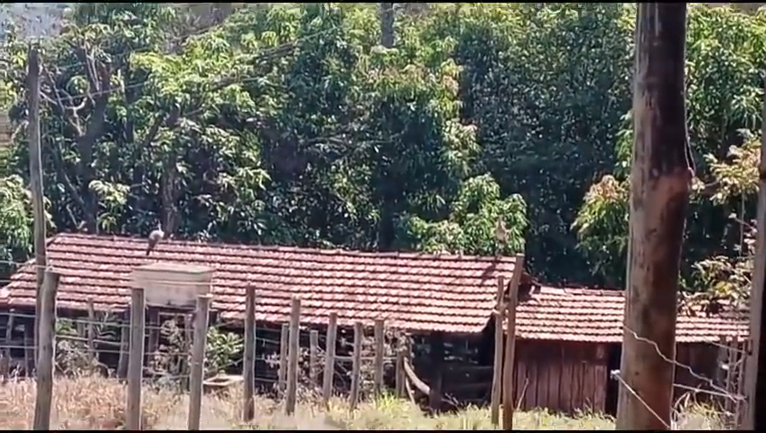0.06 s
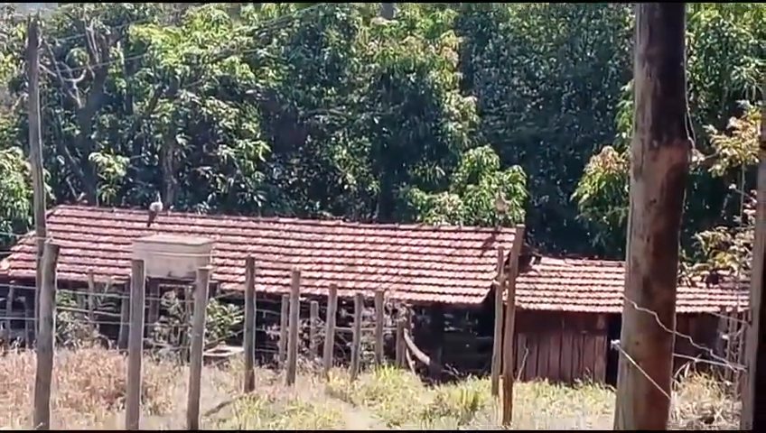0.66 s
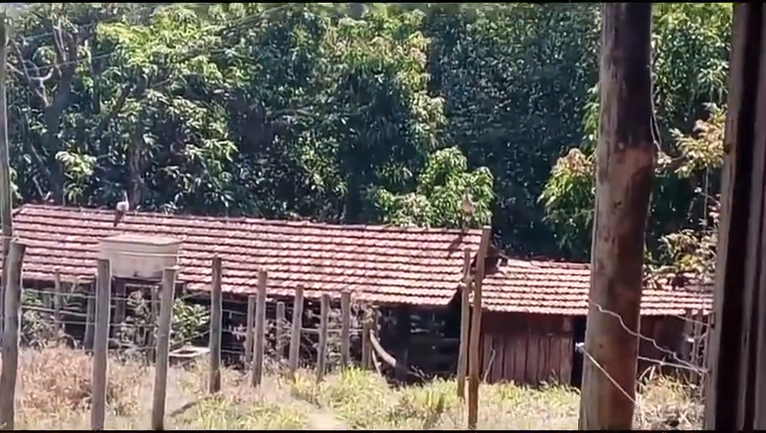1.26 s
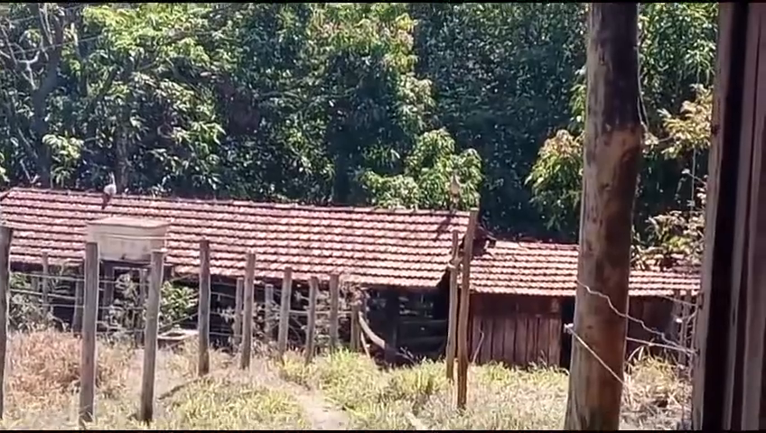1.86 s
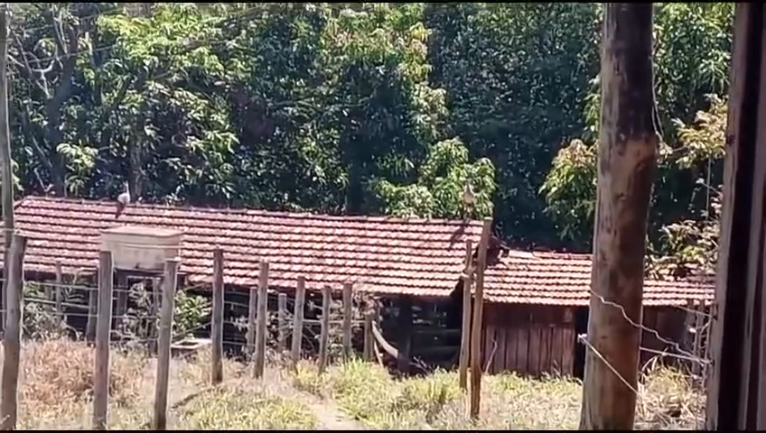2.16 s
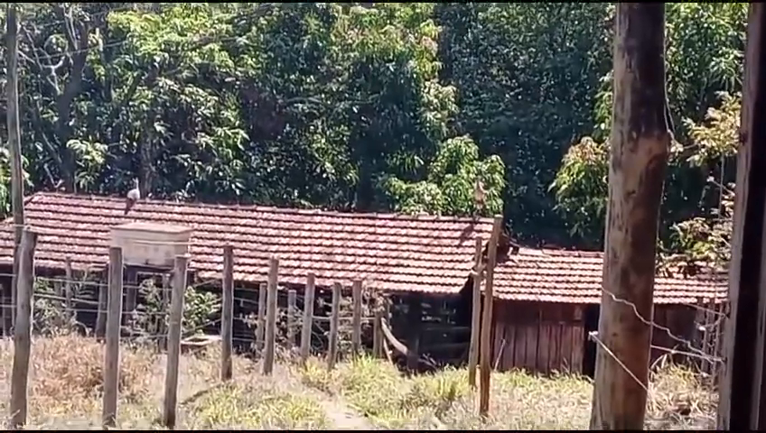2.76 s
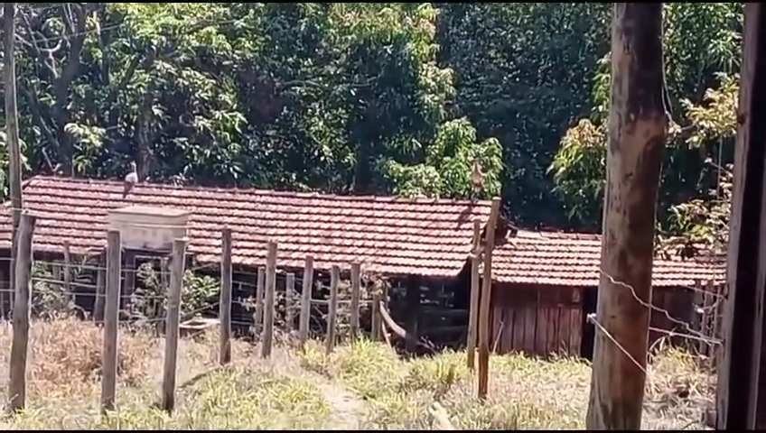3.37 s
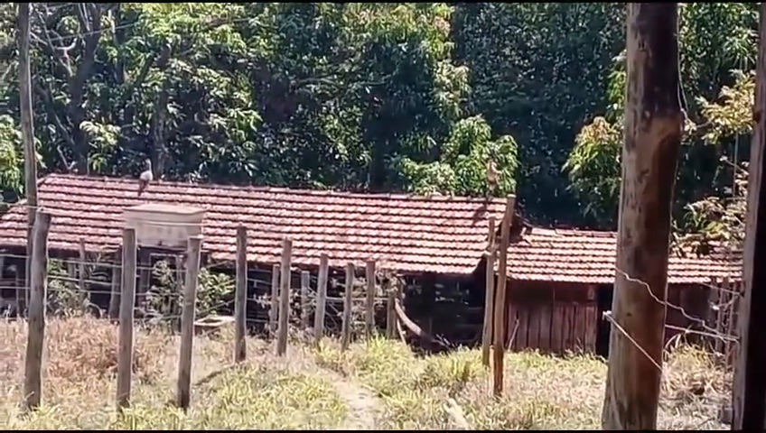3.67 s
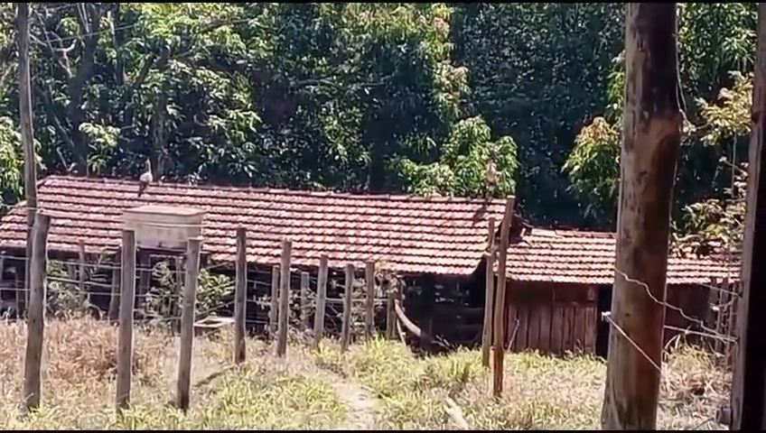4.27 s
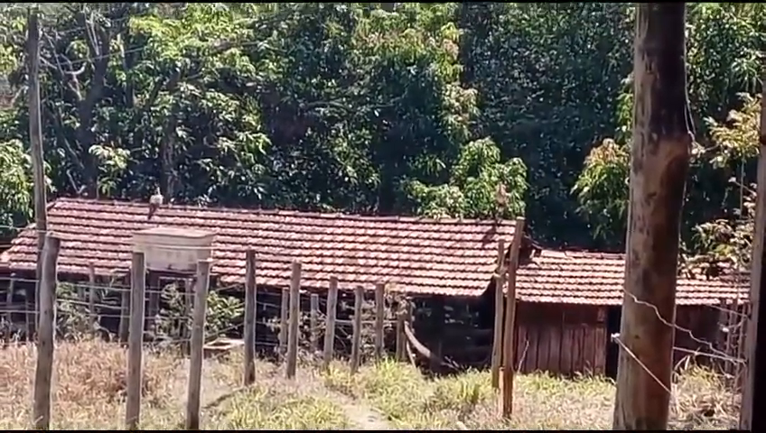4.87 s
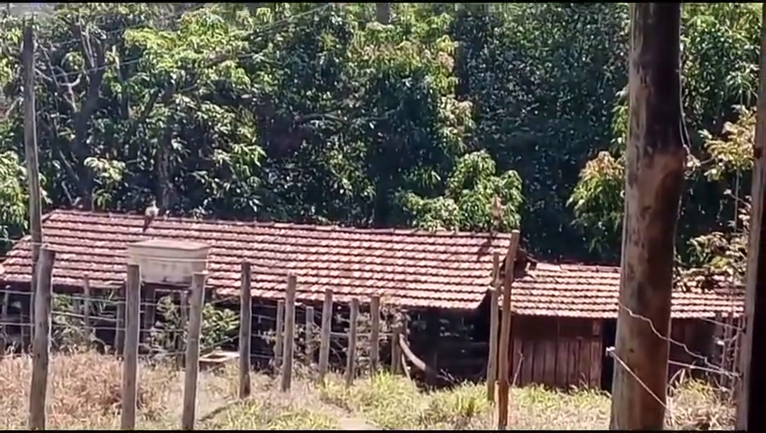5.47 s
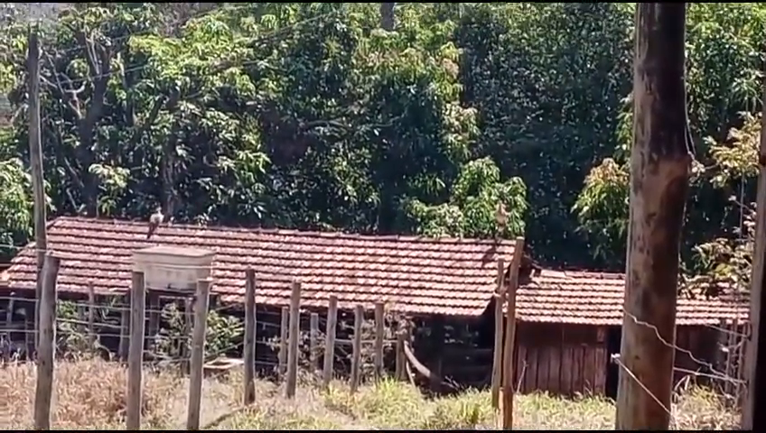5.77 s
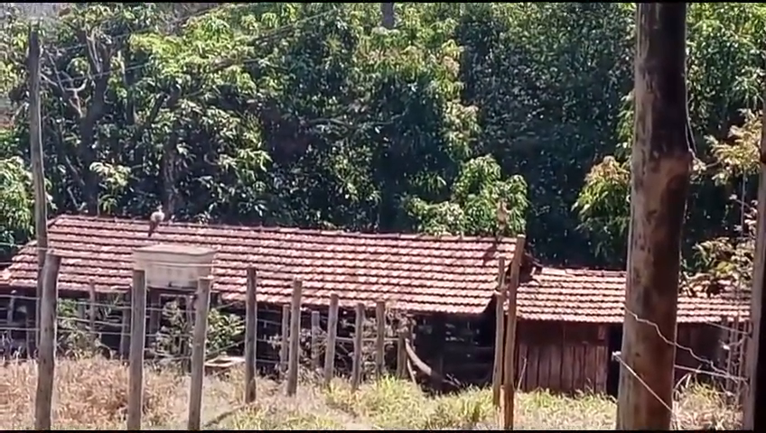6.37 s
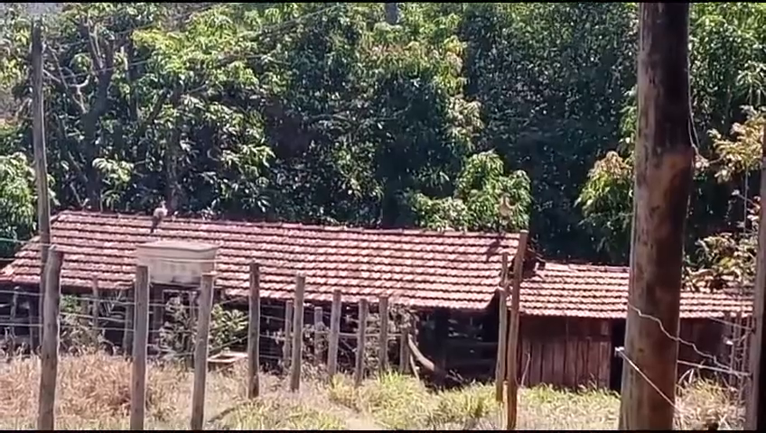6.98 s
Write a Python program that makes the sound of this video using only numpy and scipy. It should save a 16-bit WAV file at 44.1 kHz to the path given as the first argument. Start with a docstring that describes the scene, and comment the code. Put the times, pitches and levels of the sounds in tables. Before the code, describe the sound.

Sharp, raspy yelps from two large birds carry through still outdoor air with a short echo. One starts alone, its notes dropping and quickening. The other answers with faint croaks and rising yelps, and the two then call together, loudest near five seconds, before descending. The background is very quiet: a low motor hum, a far whine that comes and goes, and light handling knocks on the microphone.

```python
"""Two seriemas yelp across a farmyard, over a low electric hum and still air. The first opens alone with
a falling run: arched notes from the syrinx that mostly stutter on and break off in a rasp, while a wall
of trees sends back a bright tail. A far whine comes and goes, and soft bumps touch the microphone.
Near 3 s the second bird croaks and climbs in pitch; from about 4.3 s the two yelp in duet,
peak, and step down together to the end."""
import sys
import numpy as np
from scipy import signal
from scipy.fft import rfft, irfft, next_fast_len
from scipy.io import wavfile
from scipy.ndimage import map_coordinates

SR = 44100
rng = np.random.default_rng(int(sys.argv[2]) if len(sys.argv) > 2 else 0)


def inscribe(sig):
    """Save sig as 16-bit PCM at rate SR to the path in sys.argv[1].

    A 1-D sig is mono; a 2-D sig holds one channel per row.
    Samples are clipped to [-1, 1] before scaling.
    """
    pcm = np.round(np.clip(np.atleast_2d(sig).T, -1, 1) * 32767)
    wavfile.write(sys.argv[1], SR, pcm.astype(np.int16))


N = 310023
CUTOFF_HZ = 15750


def first_bird():
    """The lead seriema: a hoarse, stuttering voice whose echo grows towards the treble."""
    # Each row: start and end in seconds, pitch in Hz, upward glide in Hz, level in dB,
    # high harmonics in dB against the fundamental, stutter before the note in seconds.
    notes = [(0, .047, 1538, -14, -24, -23.5, 0), (.277, .383, 1471, 220, -28, -24.5, 0.015),
             (.599, .686, 1401, 136, -27.5, -23, .015), (.896, .975, 1363, 203, -27, -22, .017),
             (1.178, 1.254, 1346, 219, -26.5, -20, 0.014), (1.453, 1.522, 1314, 159, -26, -19.5, .017),
             (1.714, 1.777, 1270, 139, -26.5, -20, .017), (1.949, 2.025, 1224, 281, -29.5, -17, 0),
             (2.213, 2.272, 1202, 146, -29, -19.5, .017), (4.325, 4.402, 1182, 229, -29.5, -14.5, 0),
             (4.685, 4.783, 1837, 267, -21, -25, .021), (5.105, 5.215, 1663, -15.5, -21.5, -18, 0),
             (5.498, 5.603, 1646, 10, -22.5, -17, .018), (5.887, 5.998, 1634, -24, -24.5, -17.5, 0.02),
             (6.273, 6.375, 1603, -25.5, -24.5, -20.5, .033), (6.657, 6.743, 1568, -14, -23.5, -24, .049),
             (6.99, 7.08, 1520, 84.5, -26, -24, 0.02)]
    # Throat colour on harmonics two and three. Each row: frequency in Hz, relative level in dB.
    overtones = [(2400, -13), (2800, -11), (3100, -17.5), (3300, -11), (3650, -9.5), (4100, -15.5),
                 (4450, -10), (4750, -18), (4950, -22), (5550, -23)]
    # Send to the trees. Each row: frequency in Hz, echo in dB against the direct sound.
    echo = [(1000, -13.5), (1600, -8.5), (2800, -3), (4500, 0.5), (7000, 6), (12000, 1)]
    voice = yelps(notes, overtones, quaver=.008, jitter=.047, shimmer=.1, settle_s=.0092,
                  catch_db=-9.5, break_db=-17, break_s=.049, closed=.44, widest=.9, droop_hz=69,
                  swell_db=3, fade_db=1.57, hoarse_db=-19.5, hoarse_db_per_octave=12)
    return farmyard(voice + pips(notes), echo, build_s=.021, near_t60=.36, far_t60=1.0, far_db=-20)


def second_bird():
    """The answering seriema: a cleaner, steadier voice; three high yelps break into a lower note."""
    # Each row: start and end in seconds, pitch in Hz, upward glide in Hz, level in dB,
    # high harmonics in dB against the fundamental.
    notes = [(2.845, 2.912, 929, 60, -36.5, -21.5), (3.156, 3.251, 1121, 47, -28, -10.5),
             (3.548, 3.633, 1586, 118, -21.5, -18.5), (3.633, 3.65, 1243, -180, -29, -12.5),
             (4.029, 4.096, 1848, 67, -17, -17), (4.096, 4.13, 1419, -200, -27, -13.5),
             (4.388, 4.404, 1802, -150, -20, -22.5), (4.404, 4.485, 1486, -170, -23, -12.5),
             (4.713, 4.802, 1430, -22, -19.5, -15), (5.029, 5.118, 1344, -26, -20.5, -13.5),
             (5.324, 5.407, 1272, 0, -21.5, -17.5), (5.604, 5.69, 1204, -18.5, -25, -17),
             (5.887, 5.97, 1144, 27.5, -27, -18)]
    # Throat colour on harmonics two and three. Each row: frequency in Hz, relative level in dB.
    overtones = [(1900, -13), (2550, -13.5), (2850, -15), (3000, -6.5), (3200, -12.5), (3700, -8.5),
                 (4450, -12.5), (4750, -22), (5600, -16.5)]
    # Send to the trees. Each row: frequency in Hz, echo in dB against the direct sound.
    echo = [(1000, -17), (1600, -10.5), (2800, -11), (4500, -8), (7000, -13.5), (12000, -15.5)]
    voice = yelps(notes, overtones, quaver=.0033, jitter=.025, shimmer=.068, settle_s=.0088,
                  catch_db=-15, break_db=-15.5, break_s=.027, closed=.19, widest=.32, droop_hz=12,
                  swell_db=3, fade_db=.55, hoarse_db=-28, hoarse_db_per_octave=11)
    return farmyard(voice + croaks(), echo, build_s=.0067, near_t60=.35, far_t60=.9, far_db=-9)


def yelps(notes, overtones, quaver, jitter, shimmer, settle_s, catch_db, break_db, break_s,
          closed, widest, droop_hz, swell_db, fade_db, hoarse_db, hoarse_db_per_octave):
    """Each note starts hoarse, swells along an arch that droops at its end, and breaks off in a rasp."""
    arch_hz_per_s, louder_db_per_hz, brightness_share = 1007, .0364, .3
    out = np.zeros(N)
    usual_hz, usual_high_db = np.mean([(hz, high_db) for _, _, hz, _, _, high_db, *_ in notes], axis=0)
    for start, end, hz, glide_hz, level_db, high_db, *_ in notes:
        length, lowness = end - start + .0057, usual_hz / hz
        t = np.arange(int(length * SR)) / SR
        progress = t / length
        swing = 2 * progress - 1
        # long, low notes arch most; low ones also swell most and are hoarser
        arch_hz = arch_hz_per_s * length * lowness ** 1.3
        bend_hz = glide_hz * swing / 2 - arch_hz * swing ** 2 - droop_hz * swing ** 3
        taper_db = swell_db * lowness ** 1.4 * swing ** 2 + fade_db * swing
        arch_db = level_db + louder_db_per_hz * bend_hz - taper_db
        rough_db = level_db + hoarse_db + hoarse_db_per_octave * np.log2(lowness)
        # a fast quaver frays the high harmonics; the onset shakes harder still
        onset = np.exp(-t / settle_s)
        shake = quaver * wander(len(t), 709) + jitter * onset * wander(len(t), 1200)
        pitch = (hz + bend_hz) * (1 + shake)
        level = from_db(arch_db + .35 * wander(len(t), 90))
        level *= 1 + shimmer * onset * wander(len(t), 900)
        opening = .96 * np.exp(-closed * (progress - widest) ** 2)
        throat_db = at_hz(overtones, hz * np.array([2, 3]))
        second_db, third_db = throat_db + brightness_share * (high_db - usual_high_db)
        tone = syrinx(pitch, second_db, third_db, high_db, opening)
        add(out, start - .002, level * gate(t, length, .0032, .0079) * tone)
        # three rasps: the catch, the hoarse attack, the break
        add(out, start - .004, rasp(.013, level_db + catch_db, hz + bend_hz[0]))
        add(out, start, rasp(.31 * length, rough_db, 1.184 * (hz + bend_hz[0])))
        add(out, end - .002, rasp(break_s, level_db + break_db, hz + bend_hz[-1]))
    return out


def syrinx(pitch, second_db, third_db, high_db, opening, flutter_db=2.5):
    """A harmonic stack on a pitch curve; its overtones flutter, and swell as the beak opens."""
    # Beak colour from the fourth harmonic up. Each row: frequency in Hz, relative level in dB.
    beak = [(3700, -77), (4500, 11.5), (5500, 2), (6800, -1.5), (8000, 0), (9300, -3), (10500, -10),
            (12000, -14), (15500, -27.5)]
    phase = 2 * np.pi * np.cumsum(pitch) / SR
    high_hz = np.arange(4, int(CUTOFF_HZ / pitch.mean()) + 1) * pitch.mean()
    high = from_db(at_hz(beak, high_hz))
    gains = [from_db(second_db), from_db(third_db), *(from_db(high_db) * high / np.linalg.norm(high))]
    out = np.sin(phase)
    for k, gain in enumerate(gains, 2):
        flutter = from_db(flutter_db * wander(len(pitch), 167))
        out += gain * flutter * opening ** np.log(k) * np.sin(k * phase + rng.uniform(0, 2 * np.pi))
    return np.sqrt(2) * out


def rasp(length, level_db, throat_hz, flaps_per_s=380, breath=.12):
    """The slack membranes flap irregularly and knock on the throat's resonances."""
    # Throat resonances. Each row: multiple of the lowest, width in Hz, relative level in dB.
    throat = [(1, 324, 4.5), (1.35, 387, 3), (2.8, 840, -9), (4, 990, -17.5), (6.3, 1800, -24.5)]
    t = np.arange(int(length * SR)) / SR
    cycles = np.cumsum(flaps_per_s * from_db(2.7 * wander(len(t), 400))) / SR
    flaps = np.diff(np.floor(cycles), prepend=0) * from_db(2 * wander(len(t), 505))
    drive = flaps + breath * rng.standard_normal(len(t))
    out = 0
    for k, (multiple, width_hz, db) in enumerate(throat):
        radius, angle = np.exp(-np.pi * width_hz / SR), 2 * np.pi * multiple * throat_hz / SR
        ring = signal.lfilter([1, 0, -1], [1, -2 * radius * np.cos(angle), radius ** 2], drive)
        out += (-1) ** k * from_db(db) * (1 - radius ** 2) * ring
    return from_db(level_db) * rms_one(bandpass(out, 600, 5500)) * gate(t, length, .0007, .62 * length)


def pips(notes, step_s=.017, length=.016, growth_db=4, rise=.195, jitter=.041):
    """The voice catches before a note: scratchy upward chirps, each louder than the one before."""
    out, t = np.zeros(N), np.arange(int(length * SR)) / SR
    envelope = gate(t, length, .0019, length / 2)
    for start, _, hz, glide_hz, level_db, _, stutter_s in notes:
        start_hz, count = hz - .41 * glide_hz, round(stutter_s / step_s)
        last_db = level_db - 7.5 + 4 * np.log2(start_hz / 1410)   # high notes pip hardest
        for k in range(count):   # counting back from the note
            at, db = start - stutter_s * (k + 1) / count, last_db - k * growth_db
            pitch = start_hz * (1 + rise * (t / length - .5) + jitter * wander(len(t), 1790))
            chirp = syrinx(pitch, second_db=-15.5, third_db=-20.5, high_db=-21.5, opening=.72)
            add(out, at - .001, from_db(db) * envelope * chirp)
            add(out, at, rasp(length, db - 8, start_hz))
    return out


def croaks():
    """Voiceless rasps among the yelps."""
    # Each row: start and length in seconds, level in dB, lowest throat resonance in Hz.
    cues = [(2.823, 0.026, -51, 786), (2.903, 0.065, -53, 1090), (3.477, 0.033, -45.5, 1120),
            (3.926, 0.051, -43.5, 1070), (4.299, 0.048, -40, 980), (5.084, 0.034, -32.5, 1700),
            (6.628, 0.047, -47.5, 660)]
    out = np.zeros(N)
    for start, length, level_db, throat_hz in cues:
        add(out, start, rasp(length, level_db, throat_hz))
    return out


def farmyard(voice, echo, build_s, near_t60, far_t60, far_db, crossfeed=.057):
    """Direct sound, then quick scatter from sheds and ground and a longer tail from the trees."""
    # Colour of the two microphone ports. Each row: frequency in Hz, left minus right in dB.
    port_balance = [(500, 19.5), (1200, -2), (1700, 0.5), (2400, 6.5), (2850, 1), (3300, -7), (3900, -12.5),
                    (4400, -2.5), (5000, -0.5), (6000, -5), (7800, 2), (10000, -3), (11700, 9.5),
                    (14000, -2.5)]
    # Delay between the ports. Each row: frequency in Hz, lead of the left in radians.
    port_phase = [(300, 11), (1250, -0.02), (1700, -0.16), (2300, -1.3), (2700, -2), (3600, -1.35),
                  (5100, -1.86), (6600, 2.5), (7800, 1.34), (9100, 1.56), (12700, 2.5), (15000, -1.8)]
    t = np.arange(SR) / SR
    decay = from_db(-60 * t / near_t60) + from_db(far_db - 60 * t / far_t60)
    scatter = rng.standard_normal((2, SR)) * (rng.random((2, SR)) < .05)
    paths = (scatter + crossfeed * scatter[::-1]) * decay * gate(t, 1, build_s, .1)
    paths /= np.sqrt(np.sum(paths ** 2, axis=1, keepdims=True))
    wet = lambda hz: from_db(at_hz(echo, hz))
    # what is sent towards the trees is missing from the direct sound
    direct = colour(voice, lambda hz: 1 / np.sqrt(1 + .5 * wet(hz) ** 2))
    tail = signal.fftconvolve(colour(direct, wet)[None], paths, axes=1)[:, :N]
    sides = np.array([[.5], [-.5]])
    heard = colour(direct, lambda hz: np.exp(1j * sides * at_hz(port_phase, hz))) + tail
    ports = lambda hz: from_db(sides * at_hz(port_balance, hz))
    return colour(heard, lambda hz: ports(hz) / np.sqrt(np.mean(ports(hz) ** 2, axis=0)))


def far_whine(glide_s=.11, brighten_s=.049, gruff=.303):
    """A faint tone far to the right slides up gruffly, brightens and holds."""
    # Each row: start and end in seconds, opening and held pitch in Hz, relative level in dB.
    whines = [(.28, 0.585, 520, 548, -63), (1.52, 1.858, 420, 520, -59), (2.54, 3.275, 400, 499.6, -64.5),
              (5.05, 5.376, 500, 543, -64), (5.97, 6.309, 520, 552, -63), (6.68, 7.1, 410, 503, -59.5)]
    # Each row: harmonic number, relative level in dB.
    partials = [(1, -1.5), (2, -3.5), (3, -8), (4, -11), (5, -4.5), (6, -23), (8, -18)]
    out = np.zeros(N)
    for start, end, start_hz, held_hz, level_db in whines:
        t = np.arange(int((end - start) * SR)) / SR
        slide = (start_hz - held_hz) * np.exp(-(t / glide_s) ** 2 / 2)
        pitch = held_hz + slide * (1 + gruff * wander(len(t), 123.4)) + 1.1 * wander(len(t), 45)
        phase = 2 * np.pi * np.cumsum(pitch) / SR
        for k, db in partials:
            late = (k - 1) * brighten_s
            level = from_db(level_db + db + 2 * wander(len(t), 20.2))
            add(out, start, level * np.sin(k * phase) * gate(t - late, end - start - late, .045, .099))
    return out * from_db([[-3], [2]])


def bumps(pan_db=-5):
    """Small knocks and ticks of a hand on the microphone, leaning right."""
    # Each row: start in seconds, peak before panning in dB, top of the band in Hz, decay in seconds.
    knocks = [(.185, -47, 102, 0.079), (0.296, -26.5, 700, 0.0024), (.298, -37.5, 8750, 0.0014),
              (1.185, -47, 600, 0.01), (2.145, -40, 115, 0.02), (2.29, -41, 140, 0.022),
              (3.47, -51, 107, 0.038), (4.809, -48.5, 108.3, 0.046)]
    out, t = np.zeros((2, N)), np.arange(SR // 4) / SR
    for start, level_db, top_hz, decay in knocks:
        noise = rng.standard_normal(len(t)) + .17 * rng.standard_normal((2, len(t)))
        knock = bandpass(noise * np.exp(-t / decay), top_hz / 4 + 12, top_hz)
        add(out, start, from_db(level_db) * knock / np.abs(knock).max())
    return out * from_db([[pan_db / 2], [-pan_db / 2]])


def hum(pitch_hz=101.8, octave_db=-9, trim_db=-1):
    """A motor's low, wavering drone with its octave."""
    # Fader ride. Each row: time in seconds, relative level in dB.
    fader = [(0, -58.5), (1.5, -59.5), (3.05, -65), (3.3, -72.5), (7.03, -68)]
    phase = 2 * np.pi * np.cumsum(pitch_hz + 1.47 * wander(N, 12)) / SR
    level = from_db(np.interp(np.arange(N) / SR, *np.transpose(fader)) + trim_db + wander(N, 4.7))
    return np.sqrt(2) * level * (np.sin(phase) + from_db(octave_db) * np.sin(2 * phase))


def air(level_db=-62, low_cut_hz=62):
    """A bed of still outdoor air, partly shared by both ears; the microphone drops the deep bass."""
    # Each row: frequency in Hz, relative noise density in dB.
    spectrum = [(15, -44), (25, -5.5), (113, -3), (178, -10), (482, -15), (782, -22.5), (1200, -21),
                (1620, -25), (2490, -32.5), (2770, -35.5), (3530, -33.5), (10100, -37.5), (13900, -41),
                (15500, -50)]
    noise = rng.standard_normal(N) + rng.standard_normal((2, N))
    shape = lambda hz: from_db(at_hz(spectrum, hz)) * hz ** 2 / np.hypot(hz ** 2, low_cut_hz ** 2)
    return from_db(level_db) * rms_one(colour(noise, shape)) * from_db([[-1], [1]])


def from_db(db):
    """Decibels to gain."""
    return 10 ** (np.asarray(db) / 20)


def rms_one(x):
    """Scale to unit rms."""
    return x / np.sqrt(np.mean(x ** 2) + 1e-20)


def at_hz(points, hz):
    """Read a curve on a log-frequency axis."""
    f, value = np.transpose(points)
    return np.interp(np.log(np.maximum(hz, 1)), np.log(np.maximum(f, 1)), value)


def colour(x, gain_at):
    """Equalise by a gain that is a function of frequency."""
    size = next_fast_len(x.shape[-1] + 4096)
    return irfft(rfft(x, size) * gain_at(np.arange(size // 2 + 1) * SR / size), size)[..., :x.shape[-1]]


def bandpass(x, low_hz, high_hz):
    """Keep one band, with gentle slopes."""
    return signal.sosfilt(signal.butter(2, [low_hz, high_hz], "band", fs=SR, output="sos"), x)


def wander(count, rate):
    """Smooth random modulation of spread near 1 that changes about rate times a second."""
    knots = np.arange(count) * rate / SR
    return map_coordinates(rng.standard_normal(8192), [knots], order=3, mode="wrap")


def gate(t, length, rise, fall):
    """Opens at 0 and closes at length, with smooth edges."""
    attack = np.sin(np.pi / 2 * np.clip(t / rise, 0, 1)) ** 2
    release = np.sin(np.pi / 2 * np.clip((length - t) / fall, 0, 1)) ** 2
    return attack * release


def add(out, start, sound):
    """Mix a sound in at a time in seconds."""
    at = int(np.clip(round(start * SR), 0, N))
    out[..., at:at + sound.shape[-1]] += sound[..., :N - at]


def scene():
    """Both birds in the yard, over the background."""
    return first_bird() + second_bird() + far_whine() + hum() + bumps() + air()


def record(dry):
    """A steep high cut on the whole mix."""
    return signal.sosfilt(signal.cheby2(16, 70, CUTOFF_HZ + 500, fs=SR, output="sos"), dry)


dry = scene()
out = record(dry)
inscribe(out)
```